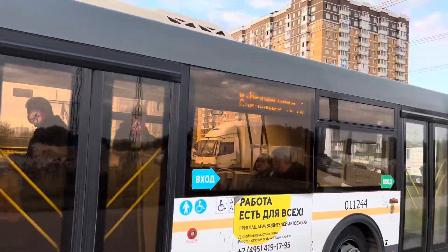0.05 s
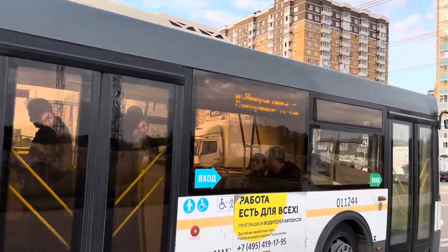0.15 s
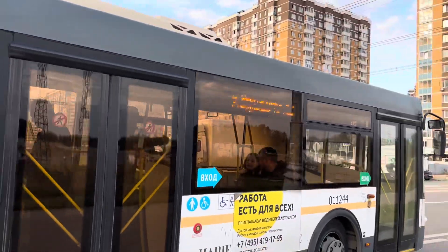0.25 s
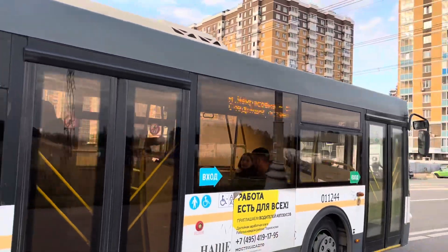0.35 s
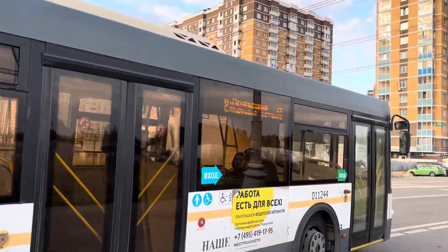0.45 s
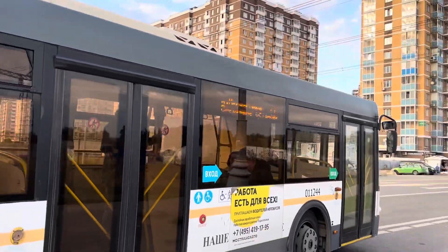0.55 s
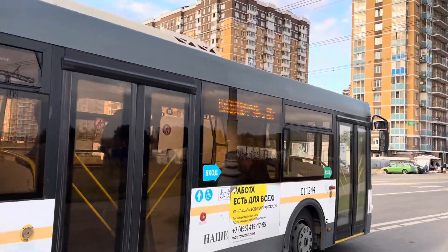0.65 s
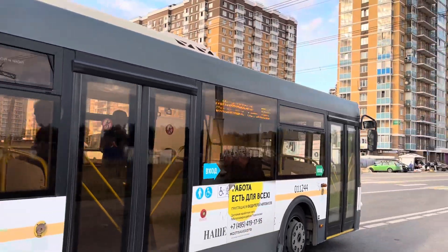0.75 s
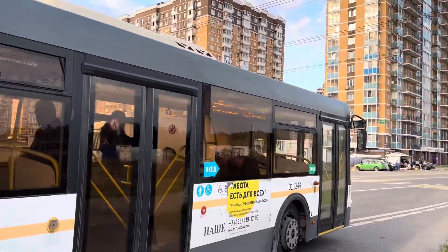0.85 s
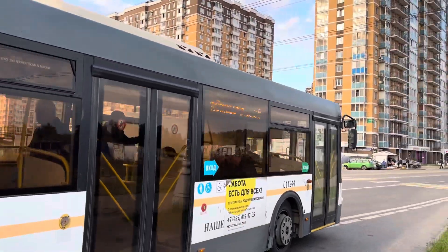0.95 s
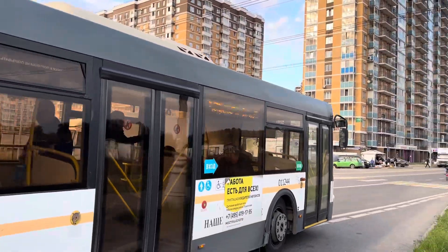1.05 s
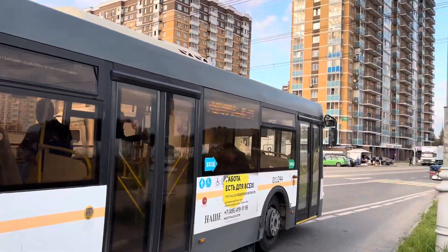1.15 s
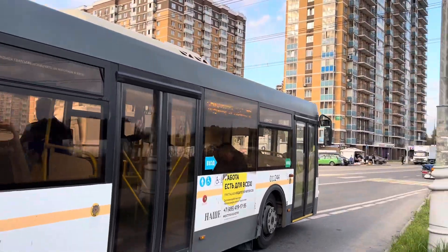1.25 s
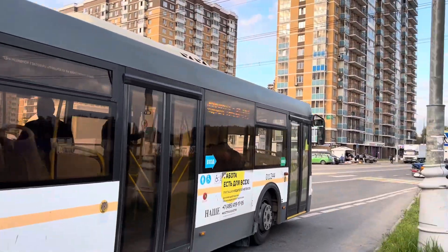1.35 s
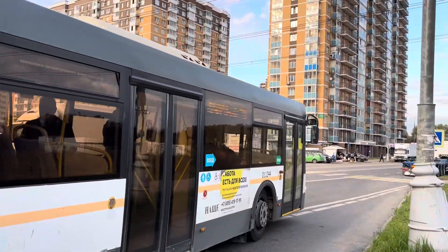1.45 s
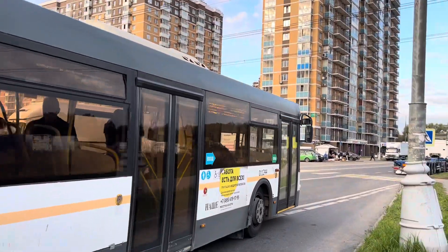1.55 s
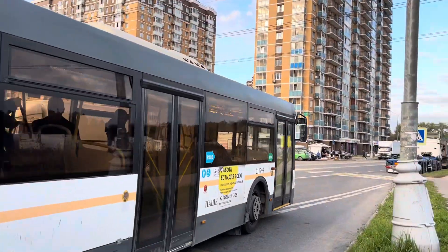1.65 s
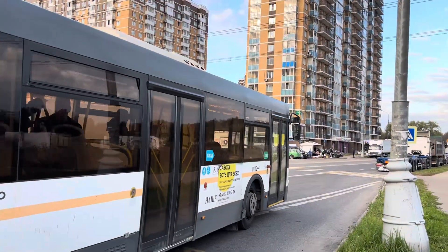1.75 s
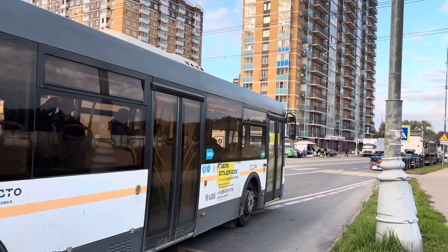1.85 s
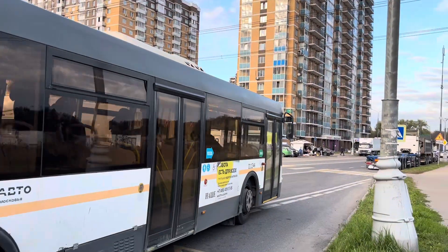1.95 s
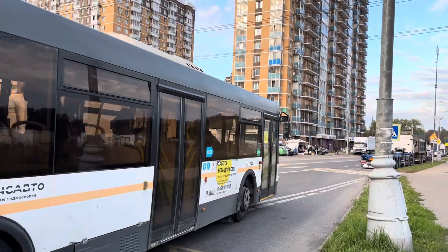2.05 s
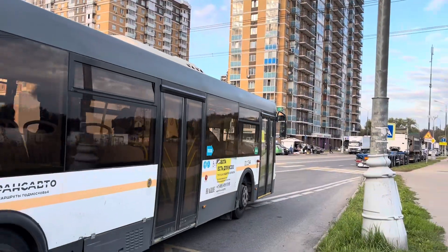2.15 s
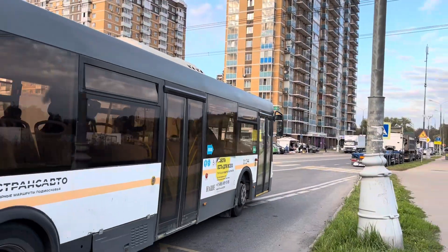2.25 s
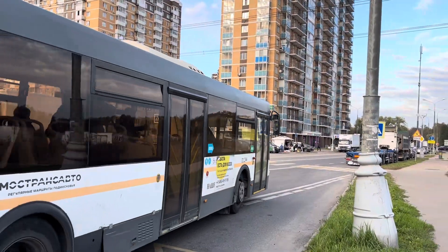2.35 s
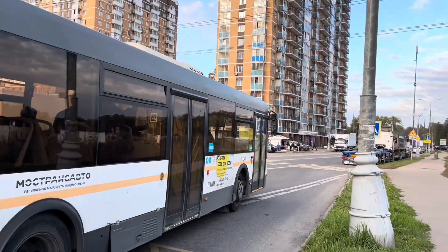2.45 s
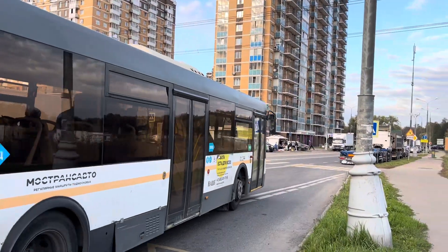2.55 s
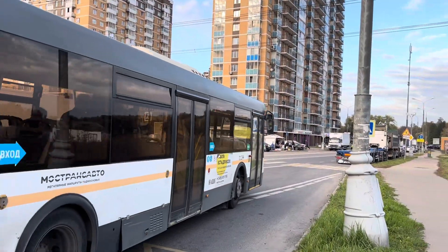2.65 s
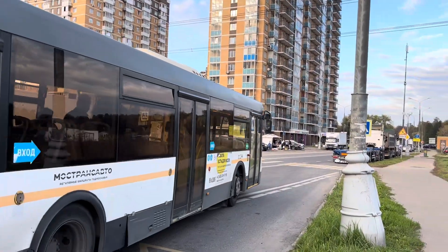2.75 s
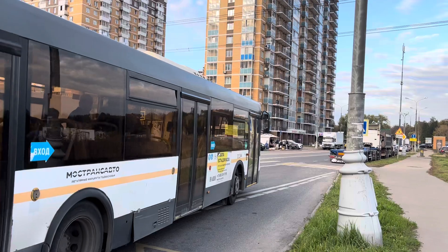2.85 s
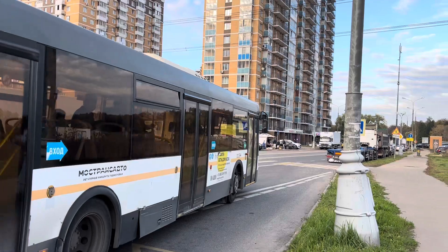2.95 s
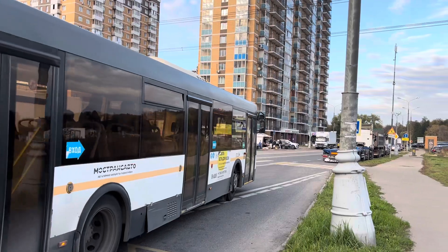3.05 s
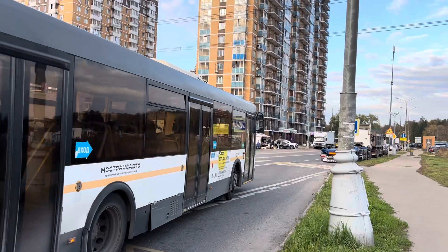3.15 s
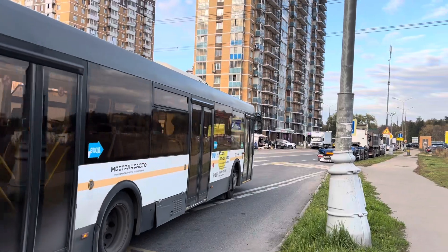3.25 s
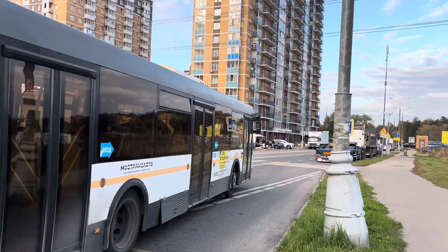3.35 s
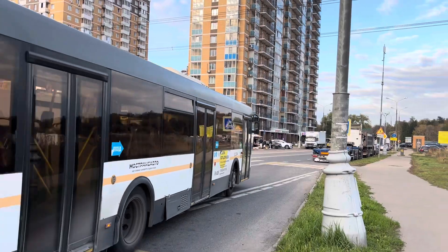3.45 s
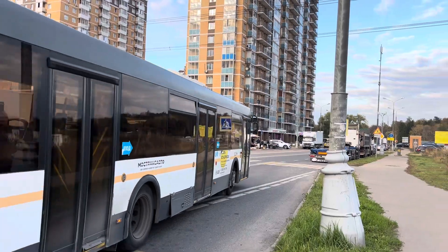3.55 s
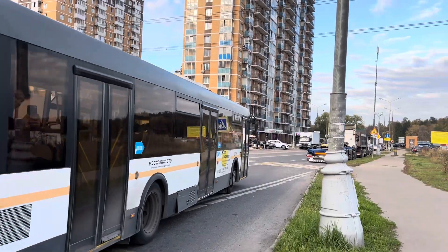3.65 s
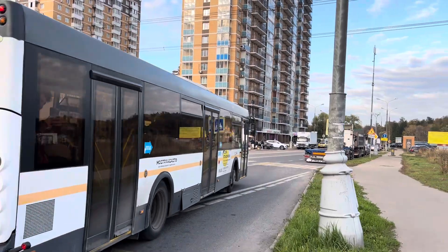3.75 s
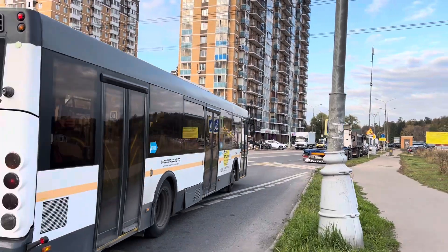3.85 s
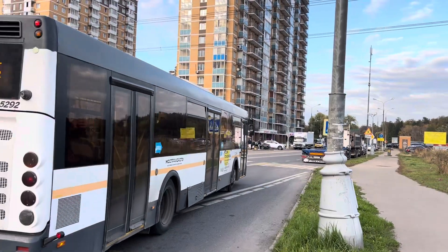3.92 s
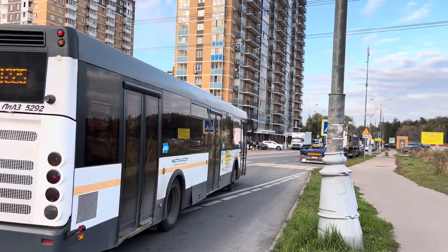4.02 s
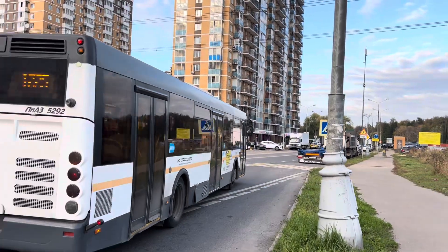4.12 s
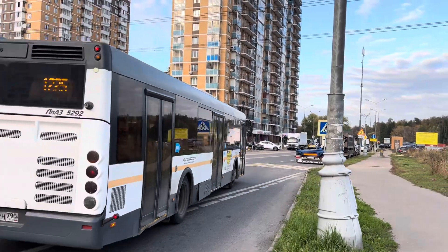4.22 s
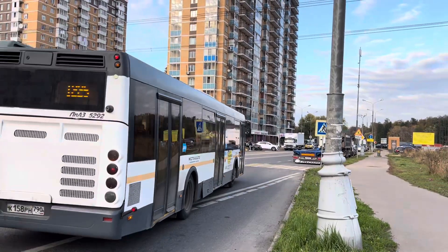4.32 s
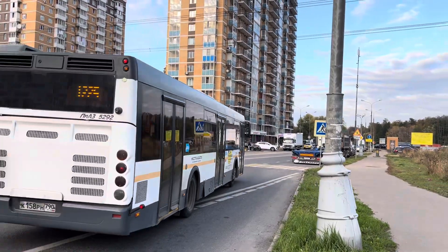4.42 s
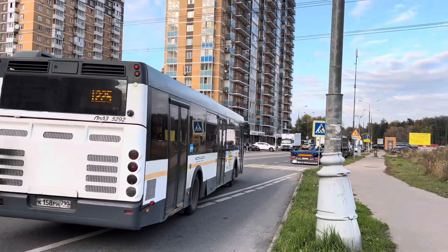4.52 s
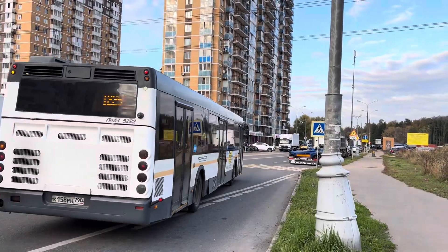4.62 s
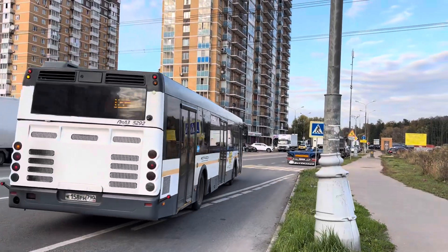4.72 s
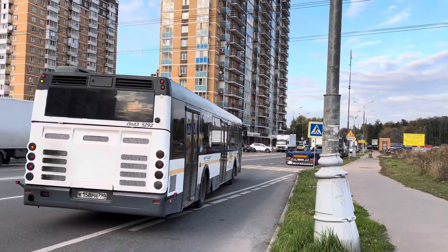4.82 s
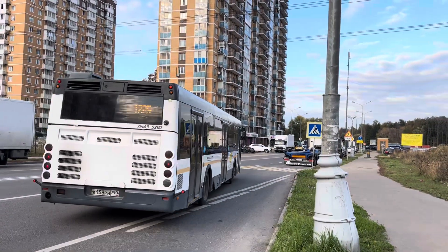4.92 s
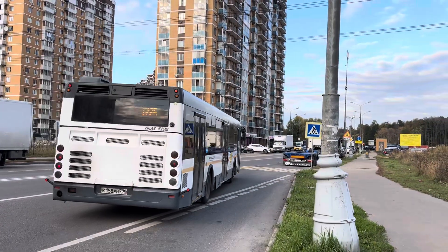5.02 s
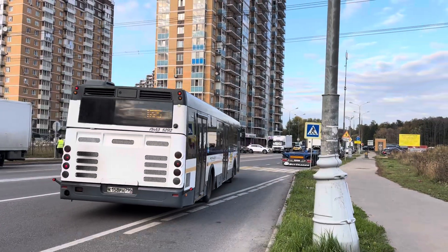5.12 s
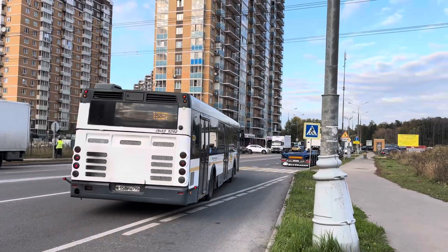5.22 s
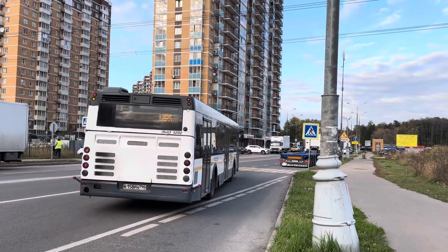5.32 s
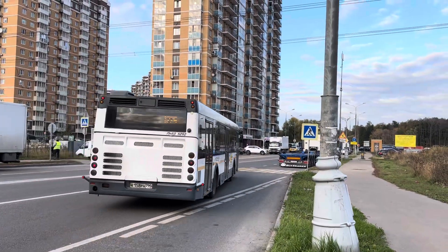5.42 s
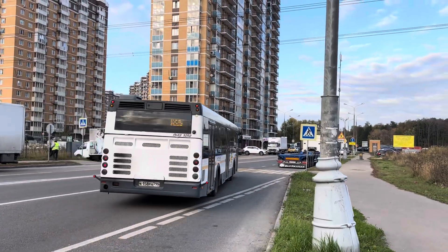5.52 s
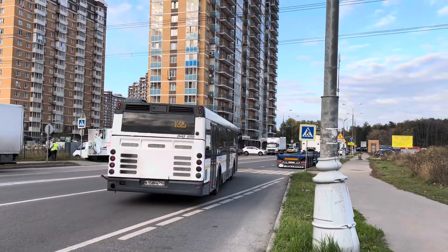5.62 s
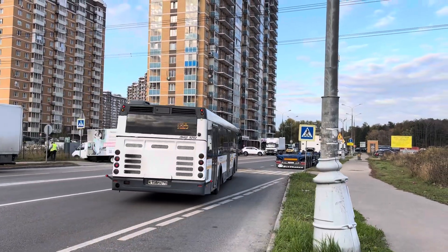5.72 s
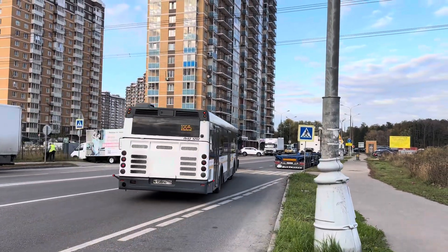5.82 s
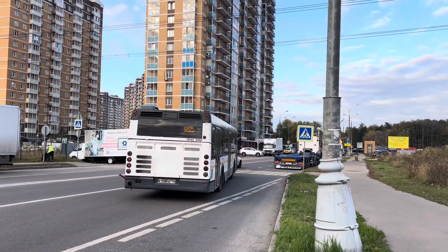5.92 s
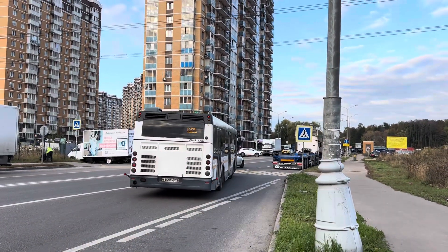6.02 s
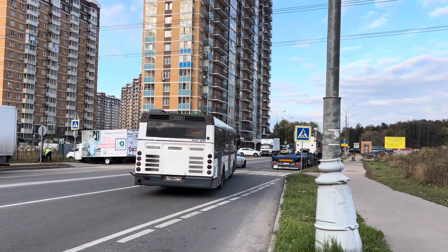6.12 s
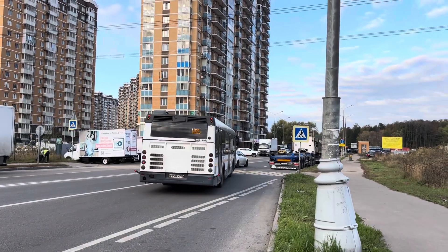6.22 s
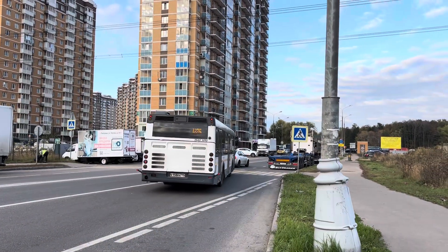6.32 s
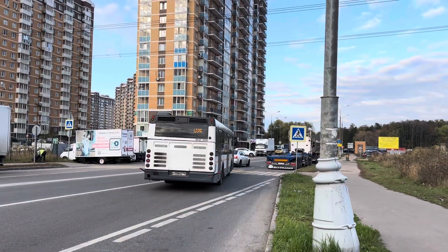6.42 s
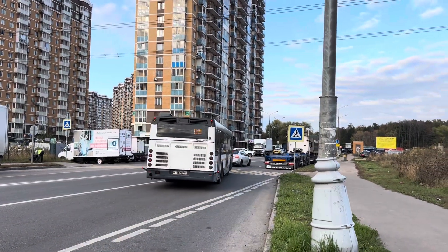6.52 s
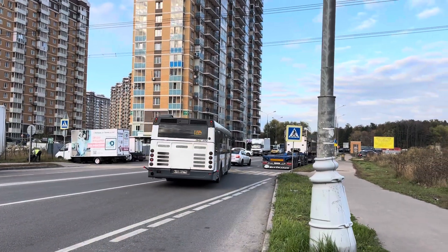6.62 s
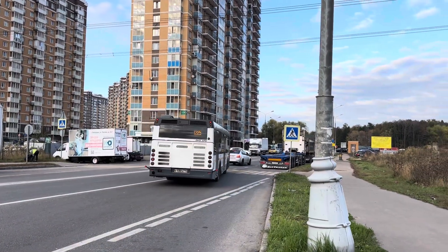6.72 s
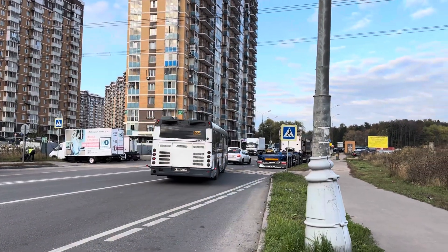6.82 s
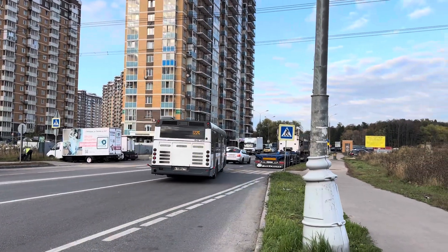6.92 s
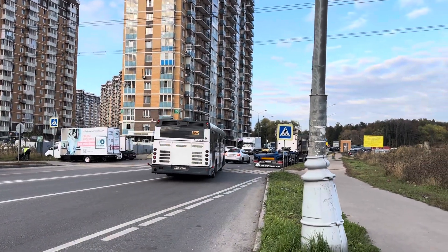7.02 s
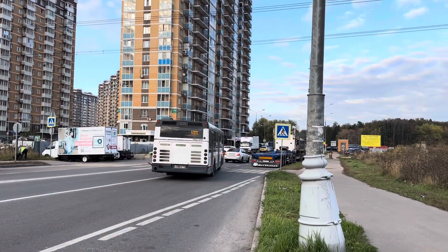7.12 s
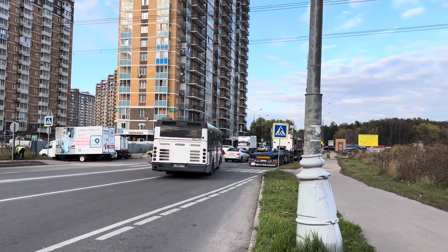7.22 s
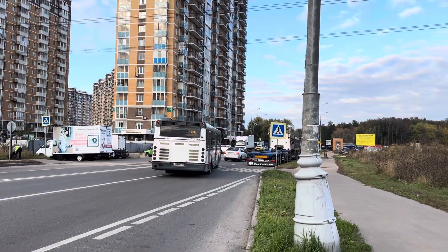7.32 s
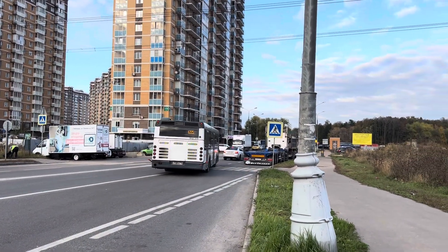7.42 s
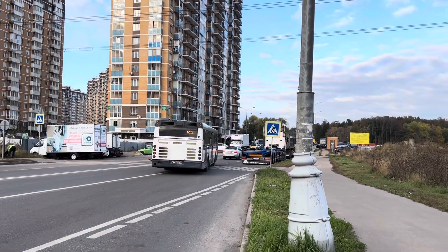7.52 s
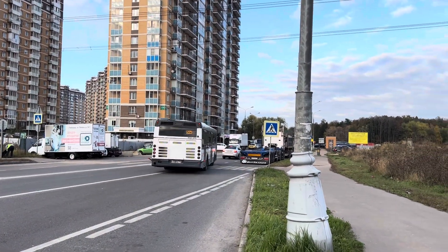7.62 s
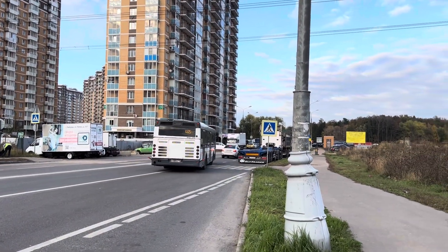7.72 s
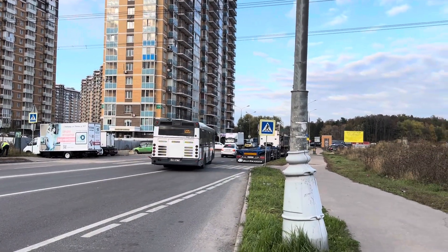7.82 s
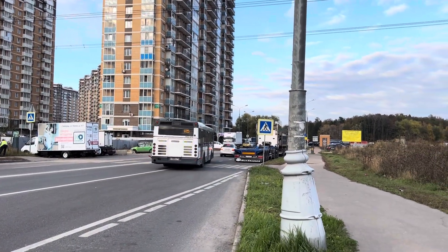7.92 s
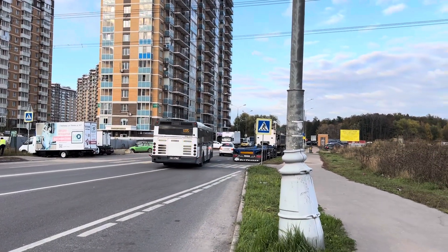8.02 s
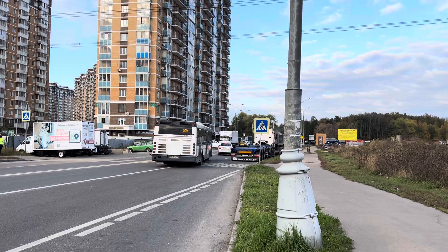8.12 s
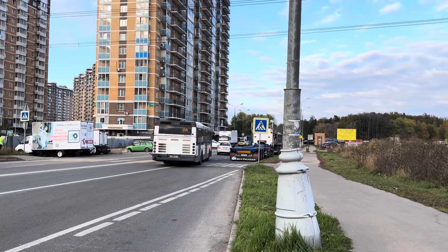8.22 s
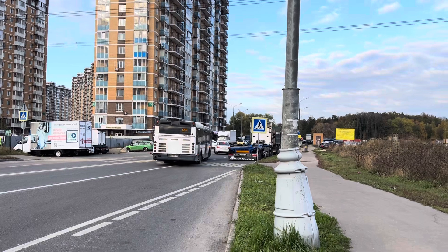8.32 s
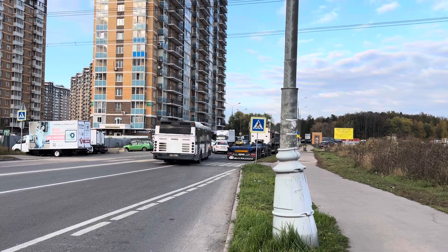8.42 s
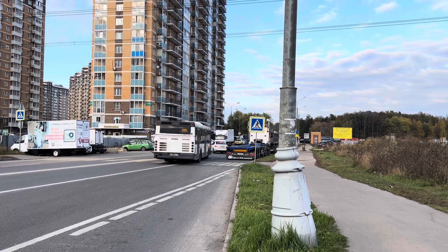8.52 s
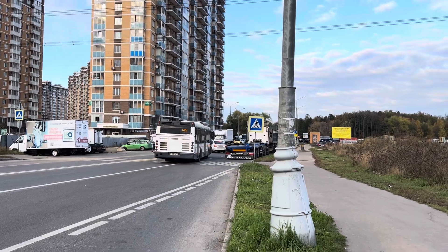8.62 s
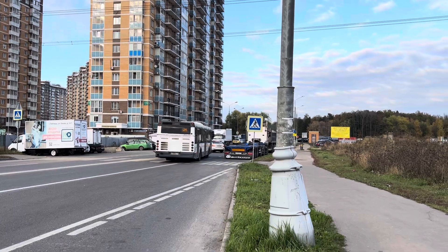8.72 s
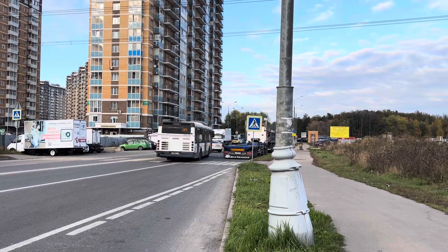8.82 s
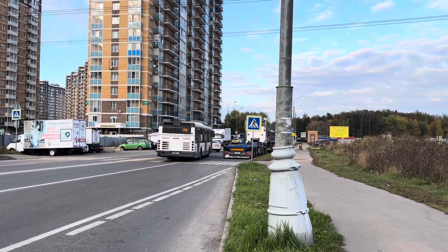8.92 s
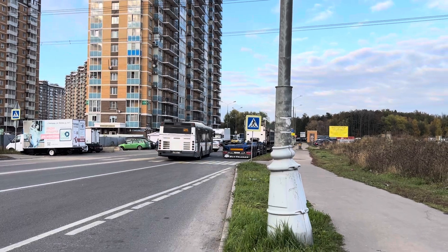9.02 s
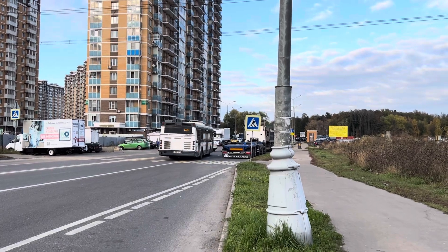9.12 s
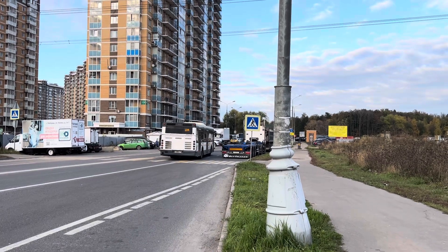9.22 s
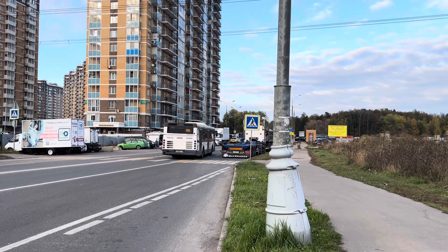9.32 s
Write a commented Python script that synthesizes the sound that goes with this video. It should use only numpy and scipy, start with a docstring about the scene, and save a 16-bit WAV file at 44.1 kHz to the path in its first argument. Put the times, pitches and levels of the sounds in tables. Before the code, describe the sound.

A diesel city bus pulls away close on the left, heard from the kerb over a steady low hum of traffic. From the start its exhaust booms and throbs, with fan roar, gear whine and a light intake hiss. The engine dips briefly at about 2 seconds, then climbs in pitch. From 3 seconds the rear passes and the exhaust moves toward the centre, with rapid airy puffs, a hiss from the rear grille and a thin, high turbo whistle rising from around 4 seconds. The pitch sags near 5 seconds and climbs again. Just after 6 seconds the engine eases off, the whistle drops away and the bus sounds quieter and farther off. Another engine drones down the road from 6 to 8 seconds. The distant bus pulls again just after 7 seconds, eases at 8, and a wavering exhaust tone swells near 9 seconds amid the traffic.

```python
"""Roadside, on a phone: a six-cylinder diesel bus pulls away from a stop on the left, over steady traffic.
First its flank: the exhaust booms at the firing rate, each cylinder barks in its own way, gears whine,
the fan roars. From 3 s the tail swings to the front, valve leaks puff and the turbocharger whistles up.
Far off, from 6 s, the driver lifts and presses the pedal twice while another engine drones down the road.
A last tone swells as the bus pulls again."""
import sys
import numpy as np
from scipy import signal
from scipy.fft import rfft, irfft, next_fast_len
from scipy.io import wavfile
from scipy.ndimage import uniform_filter1d, map_coordinates

SR = 44100
rng = np.random.default_rng(int(sys.argv[2]) if len(sys.argv) > 2 else 0)


def waveform_to_disk(signal):
    """Save audio, clipped to [-1, 1], as 16-bit WAV at the path in sys.argv[1]."""
    frames = np.transpose(np.atleast_2d(signal))
    scaled = np.clip(frames, -1, 1) * 32767
    samples = np.round(scaled).astype(np.int16)
    wavfile.write(sys.argv[1], SR, samples)


N = 412776

ENGINE_SPEED = [(0, 42.98), (0.45, 44.94), (1.6, 44.92), (2, 43.54), (2.13, 41.47), (2.37, 48.34),
                (2.9, 53.44), (3.2, 53.82), (4.1, 58.85), (4.63, 59.16), (4.85, 55.48), (5.12, 53.89),
                (5.3, 56.39), (5.95, 64.13), (6.2, 62.16), (6.45, 62.92), (7.2, 60.57), (7.5, 61.12),
                (8.2, 61.11), (8.42, 58.84), (8.65, 61.09), (8.87, 59.16), (9.05, 61.55), (9.36, 61.75)]  # time_s, firing_hz
FUEL = [(0, 0.91), (6.14, 0.8), (6.25, 0), (6.4, 0.01), (6.75, 0.06), (7.02, 0.12), (7.12, 0.1),
        (7.37, 0.6), (7.88, 0.52), (8, 0.09), (8.12, 0.01), (8.35, 0), (8.5, 0.3), (8.9, 0.4), (9.15, 0.54),
        (9.36, 0.51)]  # the pedal: time_s, fuel_0_to_1
BOOST = [(0, 0.99), (5.9, 0.95), (6.12, 0.18), (6.3, 0.68), (6.8, 0.24), (8.8, 0.09), (9.15, 0.33),
         (9.36, 0.27)]  # charge pressure: time_s, boost_0_to_1
PASSING = [(0, -6, -21), (.4, -6.5, -23), (1.4, -2, -25), (1.95, -2, -36), (2.15, -1, -6.5),
           (2.4, -6.5, -1.5), (3, -2, -2.5), (3.5, -7, 0), (4.4, -48, 2.5), (4.75, -30, 2), (5.1, -33, 1.5),
           (5.5, -11, 1), (6.1, -31, 2), (9.36, -53, 4)]  # how well each end of the bus reaches the phone: time_s, flank_db, tail_db

# Mixes, a row for each part: flank_db, tail_db, no_fuel_loss_db, no_boost_loss_db
BOOM_MIX = [(-13.5, -7.5, 23, 0), (-10.5, -14.5, 27, 2.5), (-25, -20, 26.5, 13.5), (-21, -18.5, 20, 9.5),
            (-28.5, -19.5, 25, 14.5), (-27.5, -31.5, 3, 10.5), (-28.5, -24, 18, 19), (-37.5, -20, 18.5, 32),
            (-26.5, -22, 22.5, 8.5), (-37.5, -27.5, 21, 11), (-47, -21.5, 16.5, 12.5), (-41, -48, 15, 7),
            (-35.5, -33.5, 12, -0.5)]  # the boom, then its overtones
PULSE_MIX = [(-28, -22.5, 18, 7), (-34.5, -27.5, 8, 3), (-45, -23, 22, 17.5), (-46, -34, 21, 6),
             (-55, -34.5, 11, 18)]  # thump, growl, bark, hoot, ring
KNOCK_MIX = (-61, -42, 4, 18)  # the knock alone
GEAR_MIX = [(-33, -54, 0.5, 7), (-51, -57, 0.5, 12), (-53, -52, 0.5, 12), (-55, -59, 0.5, 17)]  # timing gear mesh and its multiples
HUM_MIX = [(-31, -45, 9, 9), (-24, -45, 9, 9), (-38, -80, 0, 0), (-42, -80, 0, 0)]  # tones tied to the crank

# Overtones; the two groups of three cylinders differ, adding half orders: cycles_per_firing, crest_firings
OVERTONES = [(2, .13), (3, .014), (1.5, .44), (2.5, .76), (3.5, .46), (4, .43), (41 / 6, .55), (4.5, .51),
             (5, .46), (5.5, .53), (6, .5), (19 / 6, .5)]
STANDING_WAVES = [(65, -2), (80, 0.5), (88, 0), (108, 2), (120, -5), (135, -6.5), (155, -5), (172, 3.5),
                  (185, 0), (194, -11), (208, -0.7), (225, -7.5), (240, -11), (400, -13.5)]  # the pipe lifts some overtones: pitch_hz, gain_db
# Signed pulse strength, a row for each cylinder: thump_gain, growl_gain, bark_gain, hoot_gain, ring_gain
CYLINDERS = [ (-1, 1, -1, 1, .13), (.16, -.05, .2, -.6, .08), (.3, -.42, .25, -.6, 1),
             (-.35, -.45, .45, .4, .18), (.7, -.58, .6, .1, .5), (.19, .5, -.25, -.2, .4)]
CYLINDER_KNOCKS = [.2, .1, 1, .7, .1, .35]  # one for each cylinder: knock_gain
GROWL_SWELL = [(0, -10), (.7, 0), (1.2, -2), (2.2, 8), (2.6, -7), (3.5, -11), (4.2, -3), (5, -6),
               (5.7, -4.5), (6, 1.1), (6.5, -0.5), (6.95, -17), (7.08, 8.5), (7.5, 2), (8.1, 0), (8.6, 5.5),
               (9.36, 0)]  # the chamber swells and sinks: time_s, gain_db
PULSE_DELAY_FIRINGS = .41  # pulses leave after the trough of the boom

# Resonances: pitch_hz, width_hz, gain_db
SILENCER = [(92, 40, 0)]  # thumps
TAIL_RING = [(774, 47, 0.5), (796.5, 65, 0)]  # before and after the tail turns to the phone
KNOCK_BAND = [(840, 690, 0)]  # sharp start of some pulses
CHAMBER = [(204.8, 14.2, 5.5), (225, 17, -5.5)]  # growls
PIPE = [(335, 110, 0)]  # barks
BEND = [(503.4, 23.6, 22), (557, 26, -29)]  # hoots
PIPE_MOUTH = [(318, 45, 0)]  # sings
WHIRR_BAND = [(1630, 140, 0)]  # at the flank
LOUVRE_BAND = [(4340, 420, 0)]  # at the rear

WHINE_WAVER = [(0, .6), (.35, -.4), (.52, .7), (.75, -1.1), (.95, .2), (1.8, .1), (2.02, -.6), (2.13, 1.5),
               (2.3, 0), (7.1, 0), (7.25, .3), (7.45, .7), (7.63, -.7), (7.87, .2), (8.05, -.7), (8.22, .1),
               (8.33, .8), (8.45, -.3), (8.7, .3), (8.87, -.5), (9.07, .4), (9.2, -1), (9.36, 1.3)]  # the whine's pitch wavers slightly: time_s, pitch_offset as firing_hz
WHINE_SWELL = [(0, -5), (.6, -2), (.9, 1), (1.6, 1), (2.1, 4), (2.4, 2), (3.2, 1), (3.6, -6), (3.85, 4),
               (4, 3), (4.2, 0), (4.4, -5), (4.8, -7), (4.95, 2), (5.1, 2), (5.3, -4), (5.55, 4), (5.95, 5),
               (6.1, 1), (6.25, 3), (6.5, -2), (7, 0), (7.5, 1), (8.05, -4), (8.2, 1), (8.35, -2), (8.5, 3),
               (8.7, 6), (9, -3), (9.36, -4)]  # the whine sings louder at times: time_s, gain_db
HUM_ORDERS = [25 / 6, 26 / 6, 55 / 6, 82 / 6]  # crank tones: cycles_per_firing

# Noise spectra: frequency_hz, density_db
FLANK_SPECTRUM = [(40, -20), (100, 11.5), (200, 17.5), (290, 4.5), (420, -0.5), (600, -2), (1000, 6.5),
                  (1700, 3), (2500, -8.5), (3500, -12.5), (4800, -66), (6200, -15.5), (9000, -47),
                  (16000, -41)]
GRILLE_SPECTRUM = [(40, -3), (100, 18), (300, 20), (600, 15), (950, 8), (1230, 11.5), (1500, 0), (1900, 5),
                   (2250, -2.5), (2700, -3.5), (3300, -2), (4400, -4), (6000, -8), (8000, -12),
                   (16000, -15.5)]
INTAKE_SPECTRUM = [(5000, -39.5), (6300, -10.5), (7500, 2), (8800, -6.5), (10000, -28), (12500, -9.5),
                   (16000, -36)]
TRAFFIC_SPECTRUM = [(20, -1), (60, 20), (200, 9.5), (310, 6), (450, -6), (900, -1.5), (1600, -9),
                    (2200, -17.5), (3500, -21), (5000, -26), (7500, -27), (16000, -69)]
PUFF_SPECTRUM = [(2000, -51), (5000, 2.5), (8000, 9), (16000, 7)]

# Bands that stand out in the noise: centre_hz, width_hz, rise_db
BODY_PANELS = [(790, 60, 4), (1200, 90, 3), (1660, 140, 3), (2290, 100, 2), (3300, 90, 1), (4400, 130, 2),
               (5800, 150, 4), (6820, 140, 3), (7300, 130, 4)]
TRAFFIC_BANDS = [(767, 68, 6), (1156, 85, 5), (1695, 100, 9), (2320, 120, 5.5), (4400, 120, -9),
                 (5640, 150, 4), (6820, 140, 6.5), (7460, 130, 3.5)]

# Rise and fall of single sounds: time_s, level_db
INTAKE_LEVEL = [(0, -57.5), (.8, -52.5), (1.6, -46.5), (2.4, -40.5), (2.9, -41), (3.4, -46), (4, -44.5),
                (5, -74), (9.36, -111)]
WHIRR_LEVEL = [(0, -48), (1, -46.5), (2, -46), (2.6, -60), (3.1, -42), (3.5, -74), (9.36, -82)]
TRAFFIC_LEVEL = [(0, -34), (3, -31), (6, -35), (7, -33), (8, -30.5), (8.6, -30), (9.36, -28)]
LEAK_LEVEL = [(0, -79), (2.8, -41.5), (3.5, -37.5), (4.2, -38.5), (5.9, -43), (6.2, -69), (9.36, -96)]
LOUVRE_LEVEL = [(0, -80), (2.9, -77), (3.4, -36), (4.4, -38), (4.8, -76), (6, -59), (9.36, -87)]
PULL_LEVEL = [(0, -84), (8.6, -80), (8.85, -48), (9.03, -48), (9.12, -35.5), (9.36, -38.5)]

BAY_ROAR = [(0, -27, -56), (.8, -27.5, -51), (1.6, -28.5, -45), (2, -26, -45.5), (2.4, -22.5, -39.5),
            (2.8, -21.5, -37), (3.2, -26, -34), (3.6, -34.5, -36), (4.4, -36.5, -36), (5.2, -28, -38.5),
            (5.9, -30.5, -37.5), (6.2, -29, -45.5), (7, -33, -50), (8, -38, -53), (9.36, -34.5, -51)]  # fan and block noise: time_s, flank_gain_db, grille_gain_db
VALVE_PUFFS = [(.2, -19), (1.151, -7.5), (2.2, -18), (3.3, -11), (4.2, -14), (5.099, -6.5)]  # leaks in one engine cycle: place_firings, gain_db
TURBO = [(3.6, 7800, -70), (3.9, 8000, -55), (4.2, 8500, -49), (4.8, 9300, -53), (5.5, 10100, -54),
         (6, 11100, -53), (6.12, 7600, -60), (6.3, 6800, -59), (6.6, 5900, -59), (6.9, 5600, -70)]  # the whistle: time_s, pitch_hz, level_db
OTHER_ENGINE = [(0, 324, -87, -94), (6.05, 320, -62, -60), (6.2, 322, -37, -59), (6.55, 302.4, -39.5, -62),
                (6.95, 300.4, -39.5, -53), (7.1, 300.4, -45, -28), (7.4, 292, -52, -35),
                (8.15, 293, -50, -31), (8.3, 290, -94, -63), (9.36, 298, -87, -86)]  # down the road: time_s, drone_hz, drone_db, hum_db

# Bearings, as how much sooner the left microphone hears: time_s, lead_ms
EXHAUST_BEARING = [(0, 0.49), (2.5, 0.51), (3.1, 0.54), (3.6, 0.033), (4.6, 0.017), (5.4, 0.039),
                   (6.2, 0.0028), (9.36, 0.009)]
BAY_BEARING = [(0, 0.44), (2.9, 0.45), (3.5, 0.36), (5.5, .32), (6.5, 0.32), (9.36, 0.36)]  # the engine bay stays to the left
MIC_LIKENESS = [(60, 1), (400, 0.86), (1200, 0.89), (2500, 0.57), (4800, 0.31), (6500, 1), (16000, 1)]  # noise at the two microphones: frequency_hz, correlation_0_to_1
PHONE_SHADE = [(60, 0.4), (130, 1.7), (300, 1.3), (700, 2.5), (1300, 0), (2400, 3), (4400, 4.5),
               (6500, -0.5), (16000, -0.5)]  # the phone's body shades the right one: frequency_hz, left_over_right_db


def amp(db):
    """Decibels to amplitude."""
    return 10 ** (np.asarray(db) / 20)


def unit(x):
    """Scale to rms 1."""
    return x / np.sqrt(np.mean(x ** 2) + 1e-20)


def at_frequency(points, hz):
    """Read (frequency_hz, value) points along a log axis."""
    knots_hz, values = np.transpose(points)
    return np.interp(np.log(hz + 1), np.log(knots_hz + 1), values)


def curves(rows):
    """One value per sample for each column after time_s."""
    time_s, *columns = np.transpose(rows)
    return [np.interp(np.arange(N) / SR, time_s, column) for column in columns]


def wobble(rate_hz):
    """A smooth random curve with rate_hz knots a second."""
    knots = rng.standard_normal(int(N * rate_hz / SR) + 4)
    return map_coordinates(knots, [np.arange(N) * rate_hz / SR])


def filtered(x, response):
    """Pass x through a complex response of frequency."""
    size = next_fast_len(N + SR // 2)
    return irfft(rfft(x, size) * response(np.fft.rfftfreq(size, 1 / SR)), size)[..., :N]


def ringing(modes, stages=1):
    """Response of resonances of alternating sign, passed through stages times."""
    return lambda hz: sum((-1) ** k * amp(db) * 1j * hz * width / (pitch ** 2 - hz ** 2 + 1j * hz * width)
                          for k, (pitch, width, db) in enumerate(modes)) ** stages


def band_lift(bands):
    """Response that raises or lowers narrow bands."""
    return lambda hz: amp(sum(db / (1 + (2 * (hz - centre) / width) ** 2) for centre, width, db in bands))


def rush(spectrum, patchy_db):
    """Stereo noise of rms 1, partly alike at both microphones, with patches of random gain."""
    def mid_and_side(hz):
        angle = np.arccos(np.clip(at_frequency(MIC_LIKENESS, hz), -1, 1)) / 2
        return amp(at_frequency(spectrum, hz)) * [np.cos(angle), np.sin(angle)]

    cells = signal.stft(rng.standard_normal((2, N)), nperseg=512)[2]
    patches = uniform_filter1d(uniform_filter1d(rng.standard_normal(cells.shape[1:]), 6, 0), 10, 1)
    pair = signal.istft(cells * amp(patchy_db * unit(patches)), nperseg=512)[1][:, :N]
    mid, side = filtered(pair, mid_and_side)
    return unit(np.array([mid + side, mid - side]))


def impulses(firings, sizes, places=range(6), scatter_db=1, jitter_s=.0001):
    """One slightly uneven impulse at each place of every six-firing cycle."""
    due = (6 * np.arange(firings[-1] // 6 + 1)[:, None] + places).ravel()
    chance = rng.standard_normal((len(due), 2))
    sample = np.interp(due, firings, np.arange(N)) + jitter_s * SR * chance[:, 0]
    strength = np.resize(sizes, len(due)) * amp(scatter_db * chance[:, 1]) * (due < firings[-1])
    return np.bincount(np.clip(sample, 0, N - 1).astype(int), strength, N)


def heard(flank_db, tail_db, no_fuel_loss_db, no_boost_loss_db):
    """Gain of a part that sounds from flank and tail and weakens without fuel or boost."""
    (flank, tail), (fuel,), (boost,) = curves(PASSING), curves(FUEL), curves(BOOST)
    both_ends = np.hypot(amp(flank_db + flank), amp(tail_db + tail))
    return both_ends * amp(-no_fuel_loss_db * (1 - fuel) - no_boost_loss_db * (1 - boost))


def firing_rate(lift_s=6.16, swing_hz=1.2, period_s=.348, fade_s=1.6):
    """Firings a second; the driveline rocks after the first lift of the pedal."""
    t = np.maximum(np.arange(N) / SR - lift_s, 0)
    return curves(ENGINE_SPEED)[0] - swing_hz * np.exp(-t / fade_s) * np.sin(2 * np.pi * t / period_s)


def exhaust_boom(firings, sharp, rate_hz):
    """The exhaust booms at the firing rate; standing waves in the pipe favour some overtones."""
    boom = -heard(*BOOM_MIX[0]) * amp(.23 * wobble(26)) * np.cos(2 * np.pi * firings)
    for (order, crest), mix in zip(OVERTONES, BOOM_MIX[1:]):
        pipe_db = at_frequency(STANDING_WAVES, order * rate_hz) + .69 * wobble(12)
        boom += heard(*mix) * amp(pipe_db) * np.cos(2 * np.pi * order * (sharp - crest))
    return np.sqrt(2) * boom


def silencer_thump(firings, rate_hz, sizes):
    """Dull pulses in the silencer; below 56 firings a second, the slower the engine the more they lag."""
    late = np.maximum.accumulate(firings - .66 - .075 * np.maximum(56 - rate_hz, 0))
    return unit(filtered(impulses(late, sizes), lambda hz: ringing(SILENCER)(hz) / (1 + (hz / 170) ** 6)))


def tail_ring(leaving, sizes, turn_s=3.97, turn_takes_s=.15):
    """A ring that rises slowly, as in two alike chambers in a row; higher once the tail has turned."""
    pulses = impulses(leaving, sizes, scatter_db=1.6, jitter_s=.0003)
    turned = np.clip((np.arange(N) / SR - turn_s) / turn_takes_s + .5, 0, 1)
    return unit(sum(filtered(share * pulses, ringing([mode], stages=2))
                    for share, mode in zip([1 - turned, turned], TAIL_RING)))


def knock(leaving):
    """The sharp start of some pulses, heard in one broad band."""
    pulses = impulses(leaving, CYLINDER_KNOCKS, scatter_db=3, jitter_s=.0004)
    return unit(filtered(pulses, ringing(KNOCK_BAND, stages=2)))


def pipe_resonance(leaving, sizes, modes):
    """Round-edged gas pulses ring one part of the exhaust; little passes below its first resonance."""
    def response(hz):
        ratio = hz / modes[0][0]
        low_cut = (1j * ratio / (.6 + 1j * ratio)) ** 2
        rounding = 1 / (1 + 1j * ratio / 1.8) ** 3 / (1 + (ratio / 1.7) ** 4)
        return ringing(modes)(hz) * low_cut * rounding

    return unit(filtered(impulses(leaving, sizes), response))


def exhaust_pulses(firings, sharp, rate_hz, mouth_s=3.4, mouth_width_s=.42, mouth_db=-25):
    """Six uneven cylinders sound each part of the exhaust; its mouth sings while it points at the phone."""
    thump, growl, bark, hoot, ring = np.transpose(CYLINDERS)
    thump_gain, growl_gain, bark_gain, hoot_gain, ring_gain = [heard(*mix) for mix in PULSE_MIX]
    mouth_gain = amp(mouth_db) * np.exp(-((np.arange(N) / SR - mouth_s) / mouth_width_s) ** 2)
    leaving = sharp - PULSE_DELAY_FIRINGS
    return (thump_gain * silencer_thump(firings, rate_hz, thump)
            + ring_gain * tail_ring(leaving, ring)
            + heard(*KNOCK_MIX) * knock(leaving)
            + growl_gain * amp(curves(GROWL_SWELL)[0]) * pipe_resonance(leaving, growl, CHAMBER)
            + bark_gain * pipe_resonance(leaving, bark, PIPE)
            + hoot_gain * pipe_resonance(leaving, hoot, BEND)
            + mouth_gain * pipe_resonance(leaving, bark, PIPE_MOUTH))


def gear_whine(firings, teeth_per_firing=18.71):
    """The timing gears mesh with the crank; their whine wavers slightly in pitch, comes and goes."""
    cycles = teeth_per_firing * (firings + np.cumsum(curves(WHINE_WAVER)[0]) / SR)
    whine = np.zeros(N)
    for harmonic, mix in enumerate(GEAR_MIX, 1):
        gain = heard(*mix) * amp(2 * wobble(22) + 2 * wobble(6) + curves(WHINE_SWELL)[0])
        whine += gain * np.sin(2 * np.pi * harmonic * cycles + .25 * wobble(40))
    return whine


def crank_hum(firings):
    """Tones tied to the crank, heard mostly from the flank."""
    return sum(heard(*mix) * amp(2 * wobble(12)) * np.sin(2 * np.pi * order * firings + .4 * wobble(15))
               for order, mix in zip(HUM_ORDERS, HUM_MIX))


def bay_roar(sharp):
    """Fan and block noise through flank, then rear grille, chopped by the firing, coloured by panels."""
    flank_db, grille_db = curves(BAY_ROAR)
    chop_db = np.cos(2 * np.pi * sharp - .8)
    flank = amp(flank_db - 3 + chop_db) * rush(FLANK_SPECTRUM, patchy_db=1.67)
    grille = amp(grille_db + 11 + chop_db) * rush(GRILLE_SPECTRUM, patchy_db=1.26)
    return filtered(flank + grille, band_lift(BODY_PANELS))


def intake_hiss():
    """The side intake hisses as the flank goes by."""
    return amp(curves(INTAKE_LEVEL)[0]) * rush(INTAKE_SPECTRUM, patchy_db=1.5)


def narrow_hiss(level, band, flicker_hz):
    """One flickering band of noise: the whirr at the flank or the hiss of the rear louvre."""
    gain = amp(curves(level)[0] + wobble(flicker_hz))
    return gain * unit(filtered(rng.standard_normal(N), ringing(band, stages=2)))


def traffic():
    """The street's low hum, drifting in level, with a few bands standing out."""
    gain = amp(curves(TRAFFIC_LEVEL)[0] + 1.1 * wobble(.75))
    return filtered(gain * rush(TRAFFIC_SPECTRUM, patchy_db=2), band_lift(TRAFFIC_BANDS))


def valve_leaks(sharp, decay_s=.006):
    """Each leaking valve lets out one bright puff an engine cycle."""
    places, gain_db = np.transpose(VALVE_PUFFS)
    openings = impulses(sharp, amp(gain_db), places, scatter_db=1.8, jitter_s=.0011)
    t = np.arange(SR // 25) / SR
    envelope = signal.fftconvolve(openings, t * np.exp(-t / decay_s))[:N]
    return amp(curves(LEAK_LEVEL)[0]) * unit(envelope * rush(PUFF_SPECTRUM, patchy_db=2.5))


def turbo_whistle(fuzz_hz=115):
    """The turbocharger's fuzzy whistle climbs, then drops away at the first lift of the pedal."""
    pitch_hz, level_db = curves([(0, 7800, -110)] + TURBO + [(7.2, 5000, -110)])
    gain = amp(level_db + 4 * wobble(150))
    return gain * np.sin(2 * np.pi * np.cumsum(pitch_hz + fuzz_hz * wobble(350)) / SR)


def other_engine(hum_hz=120.7):
    """Another engine down the road: a sinking drone, then a low hum."""
    drone_hz, drone_db, hum_db = curves(OTHER_ENGINE)
    drone = amp(drone_db + 2 * wobble(14)) * np.sin(2 * np.pi * np.cumsum(drone_hz + 9 * wobble(25)) / SR)
    hum = amp(hum_db + wobble(8.2)) * np.sin(2 * np.pi * hum_hz * np.arange(N) / SR)
    return np.sqrt(2) * (drone + hum)


def pulling_tone(firings, order=50 / 6):
    """A wavering exhaust tone swells as the distant bus pulls again."""
    gain = np.sqrt(2) * amp(curves(PULL_LEVEL)[0] + wobble(8.9))
    return gain * np.sin(2 * np.pi * order * firings + 1.3 * wobble(30))


def at_microphones(sound, lead_ms, split_hz=6900, lean_db_per_ms=.6):
    """Below the split the left microphone hears sooner and louder; above it the phase offset is fixed."""
    pair = np.broadcast_to(sound, (2, N))
    low = filtered(pair, lambda hz: 1 / (1 + (hz / split_hz) ** 12))
    sides = np.array([[-1], [1]])
    high = filtered(pair - low, lambda hz: np.exp(1j * np.pi * (hz - split_hz) / 5900 * sides))
    left = low[0] * amp(lean_db_per_ms * lead_ms)
    right = map_coordinates(low[1], [np.arange(N) - lead_ms * SR / 1000], order=3, mode="nearest")
    return high + [left, right]


def scene():
    """From the kerb: the bus moving from left to front, traffic on the left, the other engine ahead."""
    rate_hz = firing_rate()
    firings = np.cumsum(rate_hz) / SR
    # Sharp sounds keep their own firing count: behind the boom at first, further ahead as speed rises.
    lead_s, idle_hz, settle_s = .0185, 45, 1.5
    trailing = .11 * np.clip(1 - np.arange(N) / SR / settle_s, 0, 1)
    sharp = firings + lead_s * (rate_hz - idle_hz) - trailing
    exhaust = exhaust_boom(firings, sharp, rate_hz) + exhaust_pulses(firings, sharp, rate_hz)
    exhaust += pulling_tone(firings)
    whines = gear_whine(firings) + crank_hum(firings) + turbo_whistle()
    bay = bay_roar(sharp) + intake_hiss() + valve_leaks(sharp)
    bay += narrow_hiss(WHIRR_LEVEL, WHIRR_BAND, flicker_hz=8.8)
    bay += narrow_hiss(LOUVRE_LEVEL, LOUVRE_BAND, flicker_hz=14)
    bus = at_microphones(exhaust + whines, curves(EXHAUST_BEARING)[0])
    bus += at_microphones(bay, curves(BAY_BEARING)[0])
    return bus + at_microphones(traffic(), lead_ms=.44) + other_engine()


def record(dry, low_cut_hz=22, top_hz=15750, ceiling=1.02):
    """The phone shades its right microphone, cuts rumble, rounds off peaks and drops the very top."""
    def response(hz):
        shade = amp(at_frequency(PHONE_SHADE, hz) * np.array([[.5], [-.5]]))
        return shade * hz ** 4 / (hz ** 4 + low_cut_hz ** 4)

    shaded = filtered(dry, response)
    rounded = shaded / (1 + np.abs(shaded / ceiling) ** 6) ** (1 / 6)
    return filtered(rounded, lambda hz: hz < top_hz)


dry = scene()
out = record(dry)
waveform_to_disk(out)
```